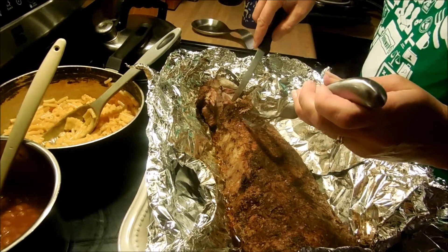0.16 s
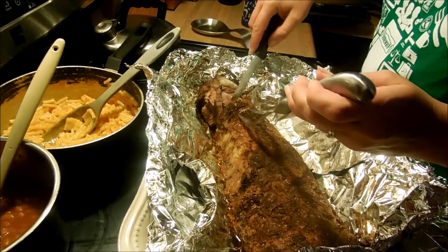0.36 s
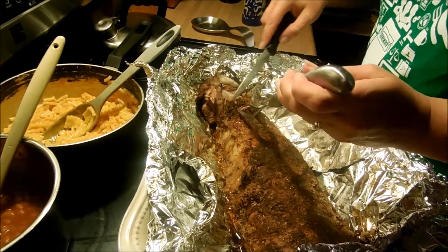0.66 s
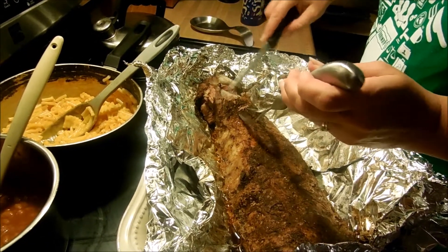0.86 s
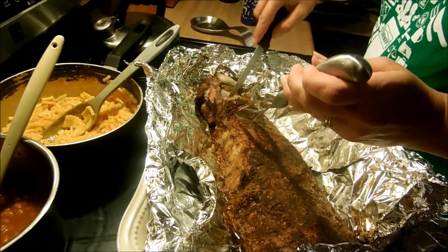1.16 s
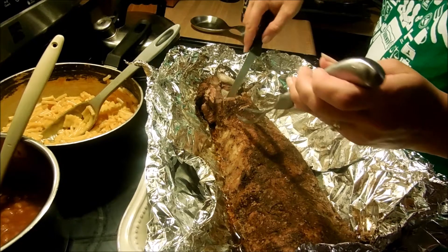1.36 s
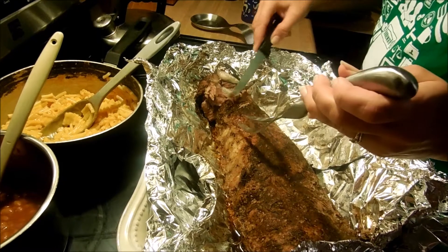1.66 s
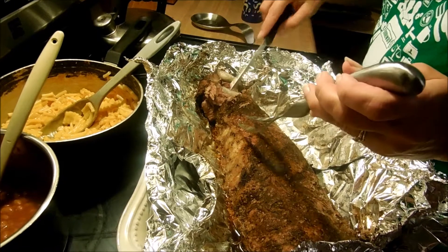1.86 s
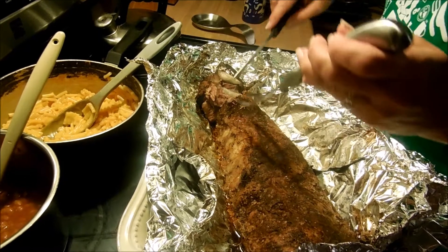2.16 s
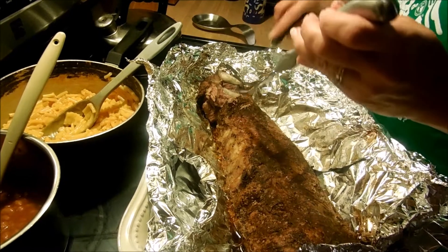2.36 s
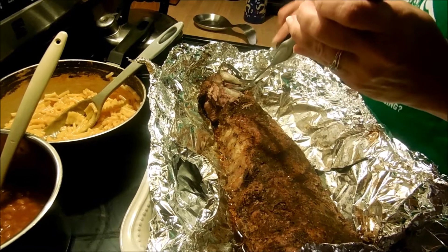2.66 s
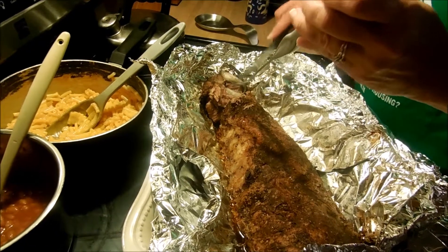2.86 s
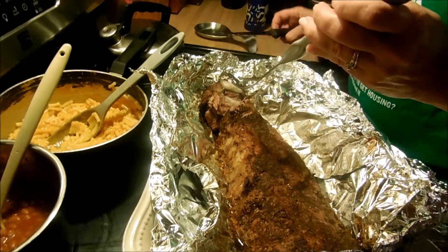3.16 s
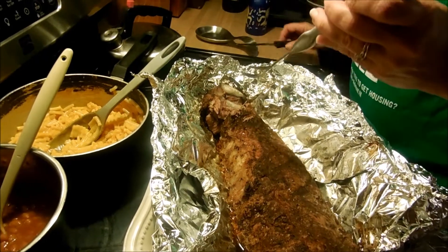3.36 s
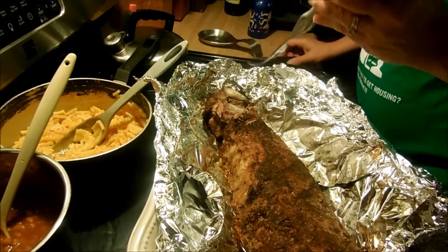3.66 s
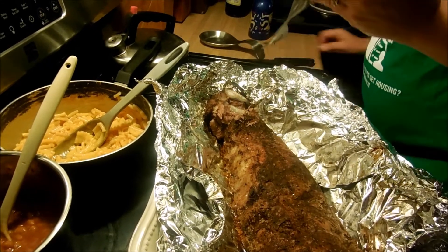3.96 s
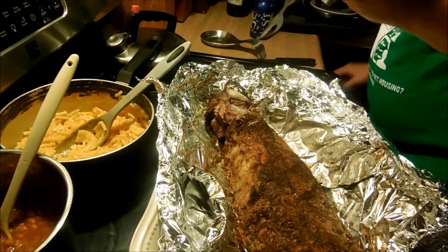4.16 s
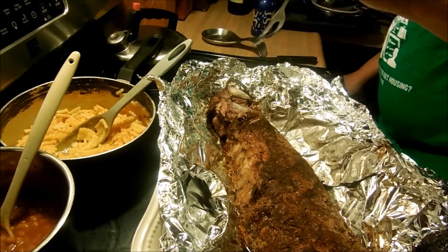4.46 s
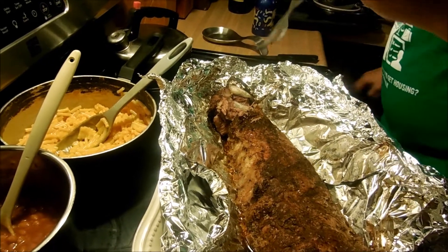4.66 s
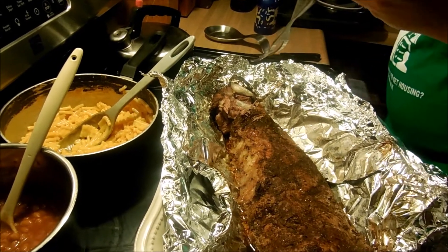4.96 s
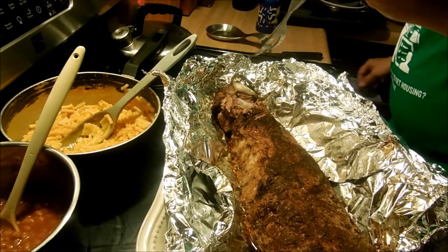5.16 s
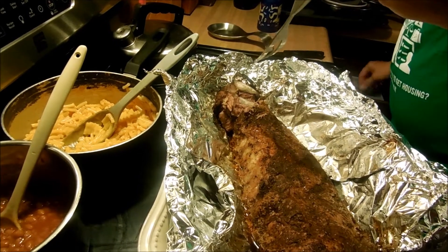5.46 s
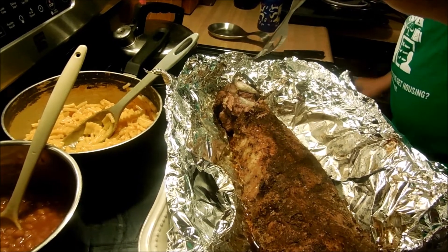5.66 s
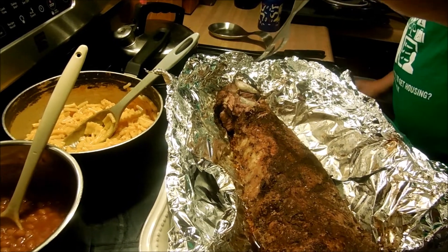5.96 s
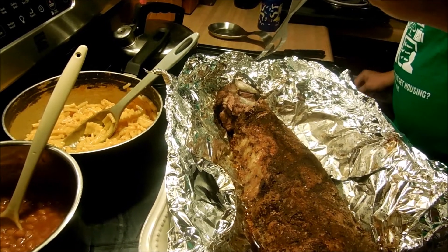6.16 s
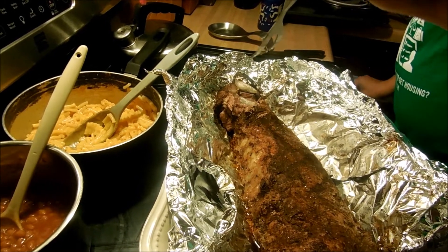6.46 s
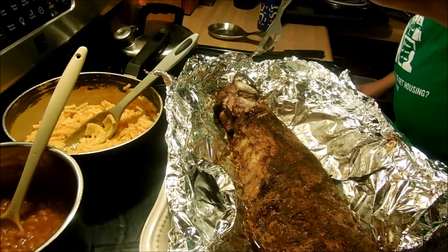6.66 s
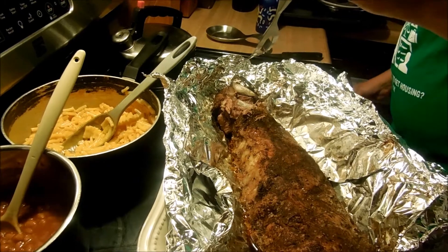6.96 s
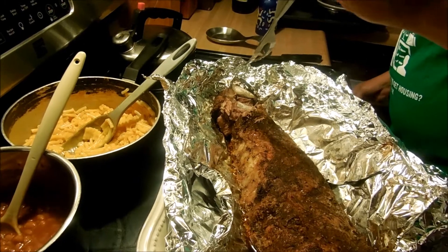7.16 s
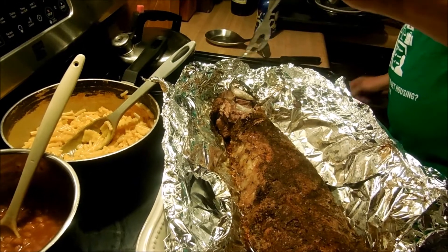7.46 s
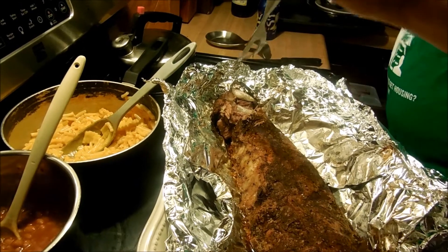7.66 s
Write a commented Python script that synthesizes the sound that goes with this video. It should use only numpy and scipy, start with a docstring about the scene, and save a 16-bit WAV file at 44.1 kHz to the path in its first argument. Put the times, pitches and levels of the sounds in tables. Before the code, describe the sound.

Cutlery ticks and clacks on a foil-lined pan, a knife clatters down and rings, then a drawer scrapes, foil rustles and dull knocks follow.

```python
"""In a small kitchen, roast meat is pulled apart in a foil-lined pan, over a faint appliance hum. Foil ticks
faintly, cutlery knocks on the pan, then a knife clatters down on the board and rings. Something, probably a
drawer, scrapes and bumps; foil rustles; a few dull knocks follow. Noise shaped by each object's resonances
makes the contacts, fluttering sines make the metal ring, and wavering sines over steady noise make the hum.
Fading noise echoes give the room."""
import sys
import numpy as np
from scipy import signal
from scipy.fft import rfft, irfft, next_fast_len
from scipy.io import wavfile

SR = 44100
rng = np.random.default_rng(int(sys.argv[2]) if len(sys.argv) > 2 else 0)


def store_wav(level_fs):
    """Save 16-bit WAV to argv[1]."""
    pcm = np.round(np.clip(np.atleast_2d(level_fs), -1, 1) * 32767)
    wavfile.write(sys.argv[1], SR, pcm.T.astype(np.int16))


N = 345303
TIME = np.arange(N) / SR
SIZE = next_fast_len(N + SR, real=True)  # spare room so that echoes do not wrap round to the start
FREQS = np.maximum(np.arange(SIZE // 2 + 1) * SR / SIZE, 1)
SIDES = np.array([[1], [-1]])  # the side signal is added on the left and subtracted on the right

# Pitch zones, in the order middle, bass, upper, treble: (low edge [Hz], high edge [Hz])
ZONES = [(400, 2000), (120, 400), (2000, 6000), (6000, 15000)]
# How wide the handling sounds are: (frequency [Hz], side against mid [dB])
WIDTH = [(60, -9.5), (110, -21.5), (200, -20), (380, -13), (700, -14.5), (1290, -7.5), (2380, -5),
         (4400, -1), (8120, -0.5), (15000, 0)]
# Damped resonances of the drawer and counter: (frequency [Hz], width [Hz], relative lift [dB])
DRAWER_BODY = [(222, 47, 7.4), (376, 22, 8.6), (559.4, 48, 9.3), (768, 46, 8.1), (971, 95, 11.9),
               (1270, 170, 5.7), (1990, 80, 5), (3054, 52, 8.6), (4020, 100, 3.3)]
# Broad colour of the foil: (frequency [Hz], relative level [dB])
FOIL_COLOUR = [(60, -53), (120, -23), (210, 5), (320, -4), (600, -3.5), (1100, -8.5), (1400, 1),
               (2200, -5.5), (3200, -6.5), (5500, -10.5), (11500, -9), (14000, -13), (15800, -24)]


def from_db(db):
    """Turn decibels into gain."""
    return 10 ** (np.asarray(db) / 20)


def rms_one(x):
    """Scale to an rms of 1."""
    return x / np.sqrt(np.mean(x ** 2) + 1e-20)


def at_hz(points, hz=FREQS):
    """Read a table between its points, on a log-frequency axis."""
    table = np.array(points)
    return np.interp(np.log(hz), np.log(table[:, 0]), table[:, 1])


def die_away(age, t60):
    """Fading that loses 60 dB in every t60 seconds."""
    return np.exp(-np.log(1000) * age / t60)


def drift(rate):
    """Random wandering of rms 1: straight lines between random points, `rate` points per second."""
    knots = rng.standard_normal(N // 10)
    return rms_one(np.interp(TIME * rate, np.arange(len(knots)), knots))


def grain(rate, rough_db):
    """Tiny slips and snaps make the strength of a contact uneven; rms 1."""
    wander = np.clip(drift(rate), -2.5, 2.5)
    return rms_one(from_db(rough_db * wander))


def stereo_spectrum(gain, width):
    """Random left and right spectra with a given colour and stereo width."""
    mid, side = rfft(rng.standard_normal((2, SIZE))) * gain
    return mid + side * from_db(at_hz(width)) * SIDES


def air_noise(colour, width):
    """Steady coloured stereo noise whose mid has rms 1."""
    noise = irfft(stereo_spectrum(from_db(at_hz(colour)), width), SIZE)[:, :N]
    return noise / noise.mean(0).std()


def resonant_noise(hz, width, size):
    """A stretch of stereo noise in one resonance; its mid has rms 1."""
    band = signal.butter(2, [hz - width / 2, hz + width / 2], "band", fs=SR, output="sos")
    noise = signal.sosfilt(band, rng.standard_normal((2, SR // 2)))
    mid, side = (rms_one(x[-size:]) for x in noise)  # keep the end, once the filter has settled
    return mid + side * from_db(at_hz(WIDTH, hz)) * SIDES


def zone_gains(db, hardness, tone):
    """Share a contact's strength among the zones: its hardness changes all but the middle."""
    return from_db([db] + [db + offset + share * hardness for offset, share in tone])


def blows(rows, tone, fall_scale):
    """Each blow swells while the surfaces chatter together, then dies at its own pace in each zone."""
    power = np.zeros((len(ZONES), N))
    for start, middle, hardness, rise, fall, *_ in rows:
        span = slice(int(start * SR), int(start * SR) + SR // 2)
        age, rise = TIME[span] - start, max(rise, 1e-4)
        zone_t60 = fall * np.array(fall_scale)[:, None]
        shape = np.clip(age / rise, 0, 1) * die_away(np.maximum(age - rise, 0), zone_t60)
        power[:, span] += (shape * zone_gains(middle, hardness, tone)[:, None]) ** 2
    return np.sqrt(power)


def strokes(rows, tone, attack_s, release_t60):
    """Rubbing sets in, swells or slackens while the hand moves, then dies away in each zone."""
    power = np.zeros((len(ZONES), N))
    for start, length, db, swell, hardness in rows:
        span = slice(int(start * SR), int((start + length) * SR) + SR // 2)
        age = TIME[span] - start
        shape = np.clip(age / attack_s, 0, 1) * from_db(swell * np.minimum(age, length))
        shape = shape * die_away(np.maximum(age - length, 0), np.array(release_t60)[:, None])
        power[:, span] += (shape * zone_gains(db, hardness, tone)[:, None]) ** 2
    return np.sqrt(power)


def vibrate(colour, body, drive, ripple_db):
    """A body's crowded, damped modes: noise in its resonances, driven separately in four zones of pitch."""
    lift = sum(db / (1 + (2 * (FREQS - hz) / width) ** 2) for hz, width, db in body)
    # countless small modes comb the upper range
    comb = np.interp(FREQS, np.linspace(0, SR / 2, 300), rng.standard_normal(300))
    lift = lift + ripple_db * comb * np.clip(FREQS / 5000, 0, 1)
    spectrum = stereo_spectrum(from_db(at_hz(colour) + lift), WIDTH)
    out = 0
    for (low, high), gain in zip(ZONES, drive):
        # the outermost zones stay open at their outer ends
        above = 1 / (1 + (low / FREQS) ** 12) if low > 120 else 1
        below = 1 / (1 + (FREQS / high) ** 12) if high < 15000 else 1
        zone = irfft(spectrum * above * below, SIZE)[:, :N]
        out = out + gain * zone / zone.mean(0).std()
    return out


def notes(rows, damping, hardness_share):
    """The spot that is struck favours one damped resonance, which gives each blow its own pitch."""
    out = np.zeros((2, N))
    for start, middle, hardness, rise, fall, hz, *_ in rows:
        span = slice(int(start * SR), int(start * SR) + SR // 4)
        age = TIME[span] - start
        shape = np.clip(age / max(rise, 1e-4), 0, 1) * die_away(np.maximum(age - rise, 0), fall)
        strength = from_db(middle + hardness_share * hardness)
        out[:, span] += strength * shape * resonant_noise(hz, min(damping, 1) * hz, len(age))
    return out


def ring(rows, modes, spread_db, side, flutter_db):
    """Every blow sets the metal's modes ringing; loose contact makes each one flutter."""
    out = np.zeros((2, N))
    for hz, mode_db, t60 in modes:
        power, phase = np.zeros(N), 2 * np.pi * rng.random((2, 1))
        for start, middle, _, rise, *_, ring_db in rows:
            span = slice(int(start * SR), int(start * SR) + SR * 3 // 4)
            age = TIME[span] - start
            strength = from_db(middle + ring_db + mode_db + rng.normal(0, spread_db))
            shape = np.clip(age / max(rise, 1e-4), 0, 1) * die_away(age, t60)
            power[span] += (strength * shape) ** 2
        live = np.flatnonzero(power)  # only the moments when the mode sounds
        wobble, slip = drift(70)[live], drift(45)[live]
        mid, wide = np.sin(2 * np.pi * hz * TIME[live] + phase + 0.25 * slip)
        out[:, live] += np.sqrt(power[live]) * from_db(flutter_db * wobble) * (mid + side * wide * SIDES)
    return out


def appliance():
    """Steady air noise with wavering motor lines."""
    # colour of the air noise: (frequency [Hz], relative level [dB])
    air_colour = [(20, -23), (60, -19), (90, -12), (145, -14.5), (195, -7.5), (290, -12), (570, -11.5),
                  (900, -14), (1650, -18.5), (4000, -26.5), (8000, -31.5), (13000, -36), (14500, -46),
                  (15800, -49)]
    # how wide it is: (frequency [Hz], side against mid [dB])
    air_width = [(60, -11.5), (110, -11.5), (200, -10), (380, -8), (700, -7.5), (1290, -1.5), (2380, -0.5),
                 (4400, 0.5), (8120, -1), (15000, -1.5)]
    # motor lines: (frequency [Hz], rms level [dB])
    motor_lines = [(59.5, -87), (90.5, -76.5), (182, -70), (204, -73), (385, -77)]
    hum = 0
    for hz, db in motor_lines:
        tone = np.sqrt(2) * np.sin(2 * np.pi * hz * TIME + 0.7 * drift(18.0))
        hum = hum + from_db(db) * grain(9.9, rough_db=2.0) * tone
    return from_db(-60.14) * air_noise(air_colour, air_width) + hum


def crinkles(per_s, cycles, spread_db, count):
    """Lone snaps, each ringing briefly in one of the foil's facets, small or large; rms 1."""
    out = np.zeros((2, N))
    for hz in np.geomspace(700, 13500, count):
        draws = rng.random((max(int(per_s * N / SR / count), 1), 4))
        # many small snaps and a few large ones, pushing either way
        size = from_db(spread_db * np.minimum(-np.log(1 - draws[:, 1]), 3)) * np.sign(draws[:, 2] - 0.5)
        at = (draws[:, 0] * (N - 8)).astype(int)
        clicks = np.zeros((2, N))
        clicks[0, at + 3] = size
        clicks[1, at + (draws[:, 3] * 8).astype(int)] = size  # up to a few samples before or after left
        # the ring loses 60 dB in the given number of cycles
        radius, angle = from_db(-60 * hz / (cycles * SR)), 2 * np.pi * hz / SR
        resonator = [1, -2 * radius * np.cos(angle), radius * radius]
        facet = signal.lfilter([1, 0, -1], resonator, clicks + 1e-18)
        out += rms_one(facet) * from_db(at_hz(FOIL_COLOUR, hz)) * hz ** 0.4
    return rms_one(out)


def foil():
    """Creases snap in dense clumps and shake the counter beneath; single snaps stand out."""
    # bass, upper and treble: (level against the middle [dB], gain per dB of hardness [dB])
    foil_tone = [(-13.5, 0.38), (-.5, 0.37), (1, 1)]
    # handfuls being crumpled:
    # (start [s], length [s], relative level [dB], swell [dB per s], hardness [dB])
    crumples = [(6.035, .13, -36, 1, 5.5), (6.24, 0.11, -51.5, -1, -11.5), (6.475, 0.061, -48, 24, -15.5),
                (6.527, .088, -35, 75, -1), (6.66, 0.12, -34, -10, 4), (6.805, 0.18, -26.5, -47, -1.5),
                (6.985, 0.059, -31, -32, 1), (7.17, 0.13, -59.5, 74, -0.5)]
    # ticks and sudden folds:
    # (time [s], relative level [dB], hardness [dB], rise [s], fall by 60 dB [s])
    folds = [(0.255, -76, 16.5, .002, .06), (0.442, -66, 17.5, 0.0016, 0.04), (1.668, -72, 11, .004, .07),
             (4.735, -61.5, 1, .014, 0.18), (4.84, -51, -2, 0.019, 0.29), (5.19, -59, 1, 0.0044, .1),
             (5.908, -46, 5, 0.011, .17), (5.946, -33.5, -2, .012, 0.11),
             (6.128, -30.5, -1.5, 0.0084, 0.12), (6.804, -35, 9, .008, 0.28),
             (6.928, -30.5, -6.5, 0.0063, .08), (7.276, -42, -0.5, 0.0093, 0.09),
             (7.492, -47.5, 3, 0.0061, 0.12)]
    rustle = strokes(crumples, foil_tone, attack_s=0.022, release_t60=[0.45, 0.33, 0.27, 0.21])
    ticks = blows(folds, foil_tone, fall_scale=[1.0, 1.0, 1.0, 1.0])
    drive = np.hypot(from_db(-4.0) * rustle, ticks)
    clumps = grain(400, rough_db=0.3) * np.array([grain(110, rough_db=0.84) for zone in ZONES])
    counter = [(hz, width, 0.86 * db) for hz, width, db in DRAWER_BODY]
    creases = vibrate(FOIL_COLOUR, counter, drive * clumps, ripple_db=1.5)
    strength = np.linalg.norm(drive, axis=0)
    snaps = strength * crinkles(per_s=550, cycles=30, spread_db=5.0, count=30)
    return creases + from_db(-6.0) * snaps


def meat():
    """Soft fibres tear with a faint squelch: each is a smooth swell of rough, dark noise."""
    # colour of the squelch: (frequency [Hz], relative level [dB])
    meat_colour = [(100, -25), (350, 0), (850, 9.5), (1400, -8), (4000, -20), (15000, -26)]
    # fibres tearing: (centre [s], level [dB])
    tears = [(.775, -58), (1.53, -54.5)]
    half_s = 0.054  # from the centre of a tear to 1/e of its strength
    pulls = sum(from_db(db) * np.exp(-((TIME - centre) / half_s) ** 2) for centre, db in tears)
    return pulls * grain(150, rough_db=2.5) * air_noise(meat_colour, WIDTH)


def pan():
    """Cutlery strikes the pan through the foil: damped clacks, ringing metal and a pitch for each blow."""
    # bass, upper and treble: (level against the middle [dB], gain per dB of hardness [dB])
    pan_tone = [(-22, 1.4), (-2, 0.8), (-8, 1.5)]
    # cutlery on the pan: (time [s], relative level [dB], hardness [dB], rise [s],
    # basic fall by 60 dB [s], note [Hz], relative ring level [dB])
    pan_blows = [(1.188, -45, -2.5, .003, 0.035, 2420, -24), (1.284, -39.5, -5, .001, .08, 2465, -16),
                 (2.509, -27, 3.5, .005, 0.052, 790, -29), (2.523, -42.5, 3, .003, 0.037, 1700, -26),
                 (2.66, -21, 2.5, .002, 0.06, 770, -17.5), (2.704, -29.5, -0.5, .006, 0.058, 825, -23.5),
                 (2.786, -21.5, 0, .002, 0.078, 1020, -26), (2.836, -33.5, -0.5, 0.016, 0.055, 780, -14.5),
                 (2.935, -45.5, -13.5, .004, 0.077, 2500, -16.5), (2.949, -18, 0, .007, 0.02, 3100, -20),
                 (2.959, -11.5, -2.5, .004, 0.087, 2940, -.5), (3.022, -33.5, -7, 0.021, 0.14, 1750, -5)]
    # long rings: (frequency [Hz], relative level [dB], fall by 60 dB [s])
    pan_modes = [(764, -11, .26), (846, -11, .22), (1017, -13, .33), (1558, -10, .18), (1707, -3, .3),
                 (2270, -11, .28), (2484, -11, .24), (2955, -9, .2), (3358, -12, .26), (3820, -19, .27),
                 (4291, -17, .31), (8409, -24, .18)]
    # damped resonances: (frequency [Hz], width [Hz], lift [dB])
    pan_body = [(590, 70, 10), (766, 60, 5.5), (965, 70, 14), (1360, 50, 2.5), (1730, 60, 0.5),
                (2265, 60, 5), (2314, 130, 1.5), (3130, 41, -8), (3430, 32, 9), (4730, 480, 8)]
    # broad colour: (frequency [Hz], relative level [dB])
    pan_colour = [(60, -30.5), (150, -17.5), (450, -19), (700, -7.5), (1500, 1.5), (4000, -7), (6000, -13),
                  (12500, -21.5), (15500, -39)]
    drive = blows(pan_blows, pan_tone, fall_scale=[1.12, 1.3, 1.0, 1.04]) * grain(900, rough_db=1.3)
    clacks = vibrate(pan_colour, pan_body, drive, ripple_db=7.5)
    ringing = ring(pan_blows, pan_modes, spread_db=0.5, side=0.4, flutter_db=2.2)
    pitches = notes(pan_blows, damping=0.16, hardness_share=-0.1)
    return from_db(-0.6) * clacks + from_db(-5) * ringing + from_db(-4) * pitches


def knife():
    """The knife falls flat, buzzing against the board while its blade rings."""
    # bass, upper and treble: (level against the middle [dB], gain per dB of hardness [dB])
    knife_tone = [(-19, 0.2), (-1.5, 0.55), (-6, 0.96)]
    # the knife lands, bounces and rocks to rest: (time [s], relative level [dB], hardness [dB],
    # rise [s], basic fall by 60 dB [s], note [Hz], relative ring level [dB])
    knife_blows = [(3.685, -31.5, 14.5, 0.0054, .09, 2812, -7), (3.747, -59, 8, .002, .08, 5800, -11),
                   (3.756, -23.5, 8, 0.0011, 0.23, 5600, 0), (3.772, -23, 3.5, 0.0038, .18, 575, -9),
                   (3.832, -26, 1.5, 0.0174, 0.13, 10850, 0.5), (3.858, -23, -1.5, 0.007, 0.16, 868, -17),
                   (3.92, -32, -10, 0.0048, 0.11, 578, -22), (3.972, -35, -26, 0.0033, 0.25, 1010, -35),
                   (4.03, -34, -38, 0.019, 0.1, 1310, -39), (4.085, -45, -26, 0.0089, 0.1, 940, -30)]
    # long rings of the blade: (frequency [Hz], relative level [dB], fall by 60 dB [s])
    knife_modes = [(1828, -3, .25), (2332, -8, .27), (2812, 0, .22), (3956, -1, .28), (5001, -6, .24),
                   (5512, -7.5, .2), (6218, -8, .22), (7574, -9, .24), (8670, -5, .24), (9572, -9.5, .22),
                   (10771, 1, .2), (11400, -9, .2), (12712, -8, .24)]
    # damped resonances of the board: (frequency [Hz], width [Hz], lift [dB])
    board_body = [(190.3, 93, 3.2), (568, 38, 8.7), (860, 140, 4.5), (1307, 90, 13), (1830, 60, 5),
                  (2930, 110, 2.2), (4000, 130, 8.6), (5600, 1200, 2), (10300, 230, 9)]
    # broad colour of the board: (frequency [Hz], relative level [dB])
    board_colour = [(60, -31), (180, -3), (400, -7), (600, 4.5), (1500, 2.5), (5500, -8.5), (8000, -12),
                    (11000, -15), (15500, -26)]
    drive = blows(knife_blows, knife_tone, fall_scale=[1.41, 1.3, 1.1, 0.58]) * grain(500, rough_db=1.5)
    buzz = vibrate(board_colour, board_body, drive, ripple_db=4.0)
    ringing = ring(knife_blows, knife_modes, spread_db=0.0, side=0.78, flutter_db=4.0)
    pitches = notes(knife_blows, damping=0.05, hardness_share=0.44)
    return from_db(-2.5) * buzz + from_db(-4.0) * ringing + from_db(-3.5) * pitches


def squeaks_and_scrapes():
    """Surfaces stick and slip: each rub is noise in one narrow or broad resonance; some overlap."""
    # brief rubbing squeaks and scrapes:
    # (centre [s], length [s], frequency [Hz], width [Hz], level [dB])
    rubs = [(4.513, .079, 1605, 130, -63), (5.729, .11, 2080, 350, -57.5), (6.335, .08, 3340, 200, -52),
            (6.338, .097, 1510, 900, -52), (6.703, .031, 12200, 1380, -29), (7.795, .11, 1130, 450, -39)]
    out = np.zeros((2, N))
    for centre, length, hz, width, db in rubs:
        span = np.flatnonzero(np.abs(TIME - centre) < length / 2)
        swell = from_db(db) * np.cos(np.pi * (TIME[span] - centre) / length)
        out[:, span] += swell * resonant_noise(hz, width, len(span))
    return out


def drawer():
    """Wood judders along its runners and bumps, shaking its damped resonances."""
    # bass, upper and treble: (level against the middle [dB], gain per dB of hardness [dB])
    drawer_tone = [(-9.5, 0.069), (0.5, 1), (-12, 1)]
    # the drawer slides, gathering speed:
    # (start [s], length [s], relative level [dB], swell [dB per s], hardness [dB])
    slides = [(4.63, 0.47, -44.5, 27, -11.5)]
    # bumps of drawer and counter: (time [s], relative level [dB], hardness [dB], rise [s],
    # basic fall by 60 dB [s], note [Hz])
    knocks = [(4.735, -44.5, 1, .012, 0.23, 610), (4.83, -35.5, 2.5, .012, 0.15, 770),
              (4.935, -32.5, 4.5, 0.004, .065, 580), (5.012, -36, 3, 0.0041, 0.075, 610),
              (5.04, -39, 7, 0.0052, .08, 3140), (5.067, -30, 11, 0.0056, .13, 588),
              (5.08, -22, 3, .009, .1, 3560), (5.116, -23, -21, 0.01, 0.032, 570),
              (5.671, -60, 4, .004, .4, 2060), (5.903, -29, -7, 0.0049, .19, 220),
              (5.95, -38, -11, 0.0055, .12, 215), (6.04, -32.5, 1.5, 0.0091, 0.14, 3050),
              (6.128, -31.5, -3, 0.0042, 0.077, 584), (6.597, -24.5, -29, 0.0056, .11, 960),
              (7.07, -24.5, -1, .005, .085, 3000), (7.272, -34.5, -18, 0.0057, .09, 1010),
              (7.482, -27.5, -6, .002, .08, 1517), (7.493, -34, -14, 0.0052, 0.17, 980),
              (7.747, -41, 1.5, 0.0034, 0.31, 1190)]
    # broad colour of the wood: (frequency [Hz], relative level [dB])
    drawer_colour = [(40, -26), (100, -20), (180, -14), (300, -14.5), (600, 2.5), (1000, 2.5), (2000, 2),
                     (3200, -4), (5000, -9.5), (6200, -18.5), (8000, -16.5), (12000, -30.5), (15000, -56)]
    judder = grain(250, rough_db=1.0) * np.array([grain(90, rough_db=0.1) for zone in ZONES])
    sliding = strokes(slides, drawer_tone, attack_s=0.05, release_t60=[0.52, 0.62, 0.36, 0.8]) * judder
    bumps = blows(knocks, drawer_tone, fall_scale=[1.21, 0.48, 1.03, 0.86]) * grain(700, rough_db=-1.5)
    drive = np.hypot(from_db(-5) * sliding, from_db(-3.5) * bumps)
    wood = vibrate(drawer_colour, DRAWER_BODY, drive, ripple_db=3.0)
    return wood + from_db(-3.5) * notes(knocks, damping=0.19, hardness_share=0.23)


def kitchen(x, delay, build):
    """Diffuse echoes build up between the walls and die away, soonest in the high treble."""
    # how long the room sounds on: (frequency [Hz], fall by 60 dB [s])
    room_t60 = [(150, .42), (600, .36), (2000, 0.39), (6000, 0.29), (14000, 0.21)]
    age = TIME[:SR * 3 // 4]
    edges = np.geomspace(80, 16000, 9)
    response = 0
    for low, high in zip(edges, edges[1:]):
        hz = np.sqrt(low * high)
        band = signal.butter(2, [low, high], "band", fs=SR, output="sos")
        mid, side = signal.sosfilt(band, rng.standard_normal((2, len(age))))
        shape = np.clip((age - delay) / build, 0, 1) * die_away(age, at_hz(room_t60, hz))
        echo = mid + side * from_db(at_hz(WIDTH, hz)) * SIDES
        response = response + echo * shape / np.linalg.norm(shape)
    return irfft(rfft(x.mean(0), SIZE) * rfft(response, SIZE), SIZE)[:, :N]


def scene():
    """All the handling sounds in the room, leaning slightly left, over the appliance."""
    # stereo balance: (frequency [Hz], left minus right [dB])
    balance = [(60, 2.5), (110, -0.5), (200, 1.5), (380, 1), (700, 0.5), (1290, 1), (2380, 0.5), (4400, 1),
               (8120, 0.5), (15000, 4)]
    background = appliance()
    counter = foil() + meat() + squeaks_and_scrapes() + drawer()
    cutlery = pan() + knife()
    echoes = kitchen(from_db(-14) * cutlery + from_db(-12) * counter, delay=0.005, build=0.0077)
    lean = from_db(at_hz(balance) / 2 * SIDES)
    handling = irfft(rfft(cutlery + counter + echoes, SIZE) * lean, SIZE)[:, :N]
    return handling + background


def record(dry):
    """The loudest peaks are rounded and the top is cut."""
    top, cutoff_hz = 0.94, 15900
    rounded = top * np.tanh(dry / top)
    return signal.sosfilt(signal.ellip(10, 0.2, 80, cutoff_hz, fs=SR, output="sos"), rounded)


dry = scene()
out = record(dry)
store_wav(out)
```